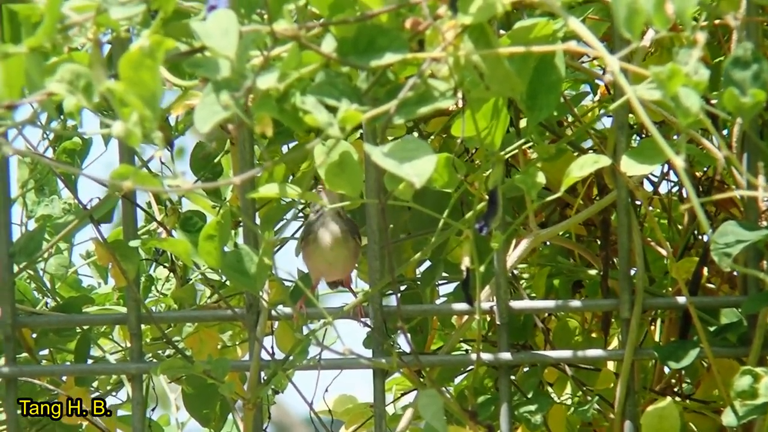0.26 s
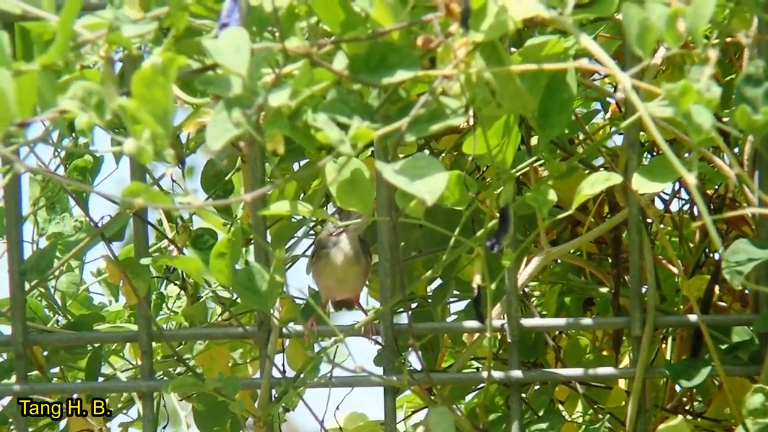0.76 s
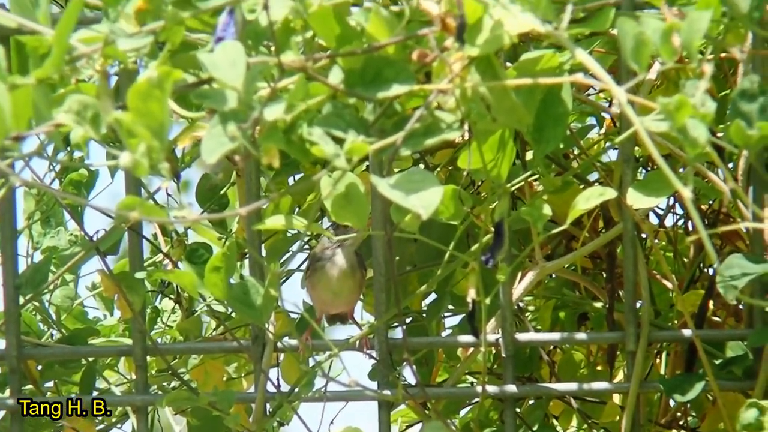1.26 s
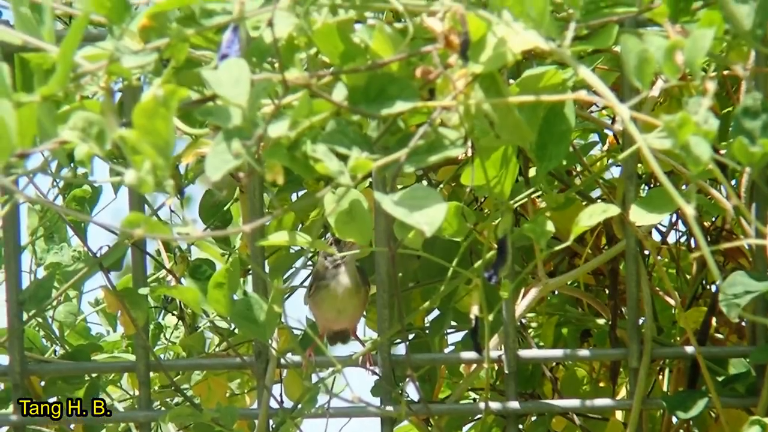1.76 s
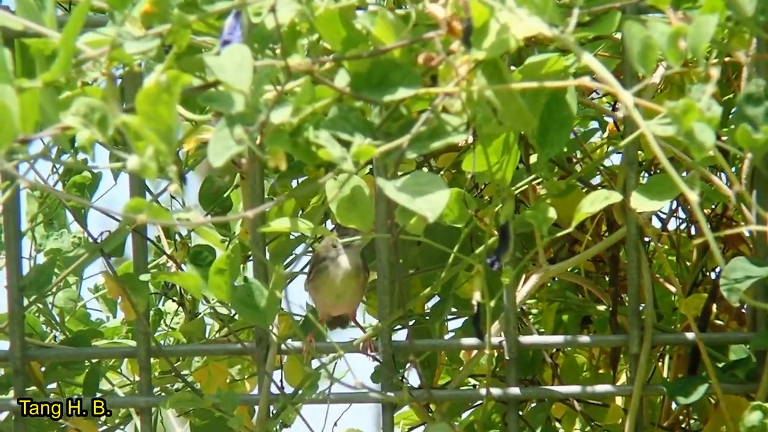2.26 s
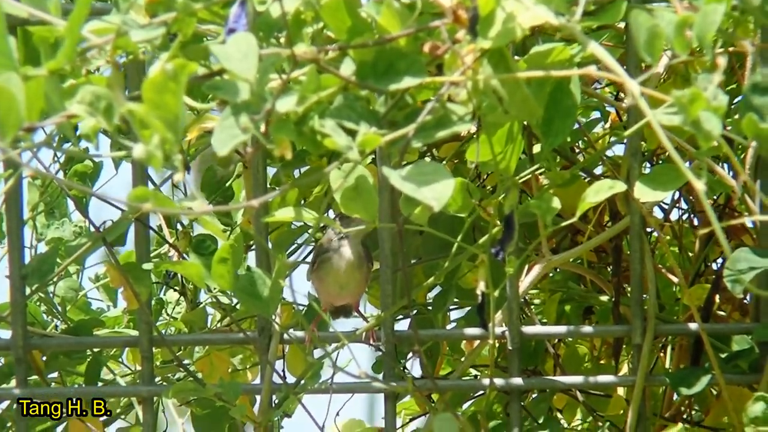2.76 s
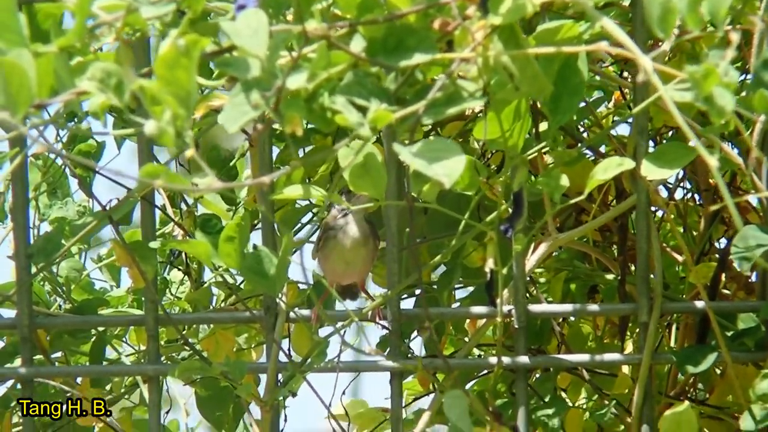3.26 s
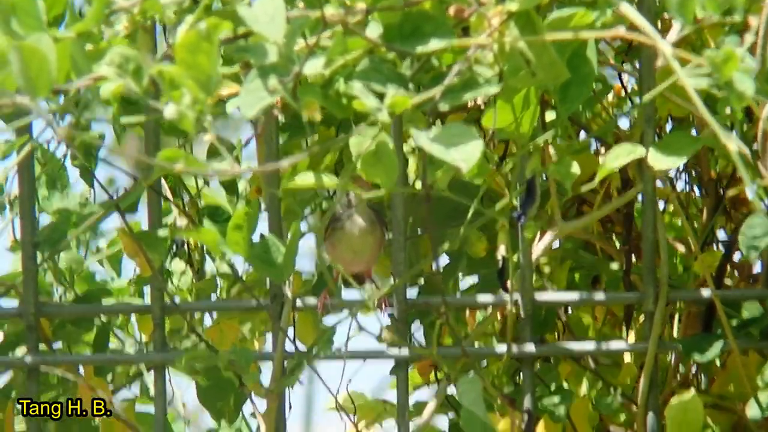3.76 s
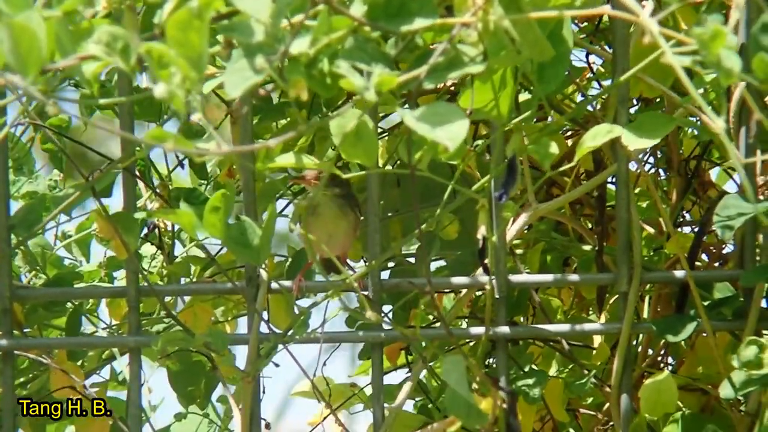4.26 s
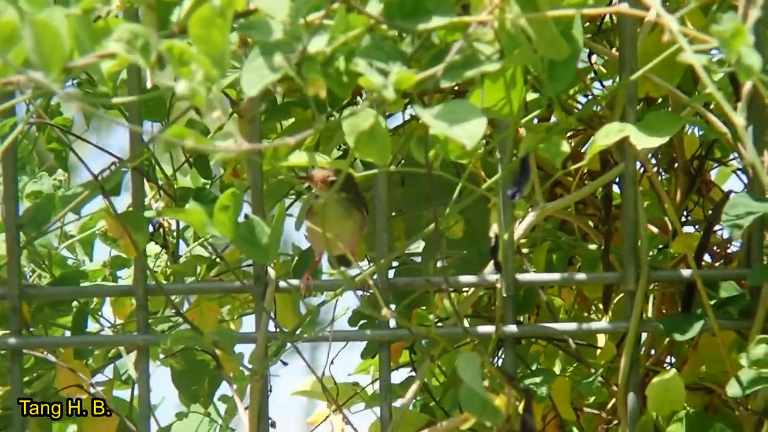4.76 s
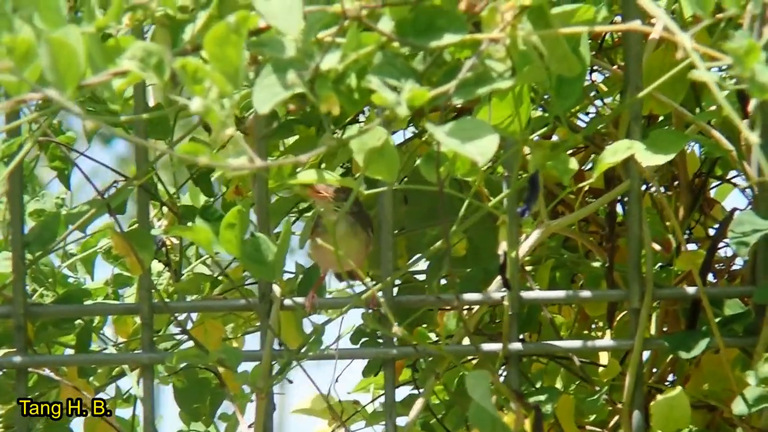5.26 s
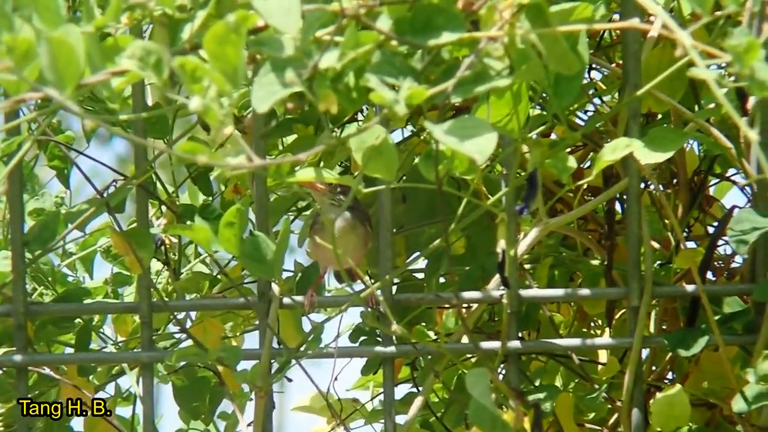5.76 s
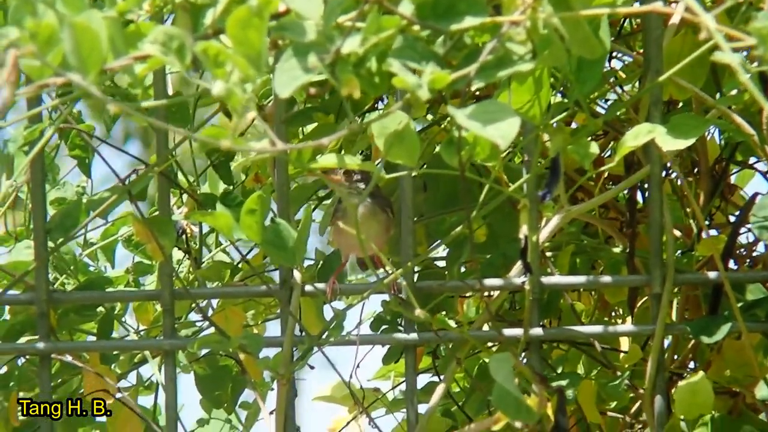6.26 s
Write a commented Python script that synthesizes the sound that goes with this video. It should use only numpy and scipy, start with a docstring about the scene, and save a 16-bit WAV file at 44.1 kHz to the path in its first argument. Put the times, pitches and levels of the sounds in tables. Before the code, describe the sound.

Piercing downward bird chirps repeat steadily in a garden, each with a short scattered tail, above quiet insects, hiss and distant rumble.

```python
"""A garden fence: a small bird perched right of a camera repeats one sharp falling whistle, a near-sine
glide with two close echoes from near surfaces and a tail of shaped noise for the scatter off foliage and walls.
Crickets trill as throbbing narrow noise, and a thin buzz of high pulse partials comes and goes.
A far bird coos in soft sines and something hollow is tapped once, as a handful of ringing modes.
Underneath lie town rumble and camera hiss, both coloured noise; the preamp and converter mark the loud notes."""
import sys
import numpy as np
from scipy import signal
from scipy.fft import rfft, irfft, next_fast_len
from scipy.io import wavfile
from scipy.ndimage import uniform_filter1d

SR = 44100
rng = np.random.default_rng(int(sys.argv[2]) if len(sys.argv) > 2 else 0)


def bounce(signal):
    """Save signal as a 16-bit WAV file at the path given by the first command-line argument."""
    frames = np.transpose(np.atleast_2d(signal))
    limited = np.clip(frames, -1, 1)
    pcm = np.round(limited * 32767).astype(np.int16)
    wavfile.write(sys.argv[1], SR, pcm)


N = 287091


def undb(db):
    """Gain of a level in dB."""
    return 10 ** (np.asarray(db) / 20)


def level(x, db):
    """Scale to an rms level in dB."""
    return x * undb(db) / np.sqrt(np.mean(x ** 2))


def pan(x, pan_db):
    """Two channels with a level difference, left minus right in dB."""
    return np.array([x * undb(pan_db / 2), x * undb(-pan_db / 2)])


def walk(rate):
    """Wandering control: random levels held 1 / rate s and slewed twice; spread near 1."""
    hold = int(SR / rate)
    steps = np.repeat(rng.standard_normal(N // hold + 1), hold)
    return 1.3 * uniform_filter1d(uniform_filter1d(steps, hold), hold)[:N]


def on_log(hz, points):
    """Read (Hz, value) points on a log-frequency axis."""
    point_hz, values = np.transpose(points)
    return np.interp(np.log(hz + 1), np.log(point_hz), values)


def played(rows):
    """Phase and gain of a tone that follows (s, Hz, rms dB) rows, silent outside them."""
    s, hz, db = np.transpose(rows)
    t = np.arange(N) / SR
    edge = np.clip(np.minimum(t - s[0], s[-1] - t) / .01, 0, 1)  # 10 ms ramps
    phase = 2 * np.pi * np.cumsum(np.interp(t, s, hz)) / SR
    return phase, edge * undb(np.interp(t, s, db)) * np.sqrt(2)


def coloured(points, alike, swell_db, flicker_db):
    """Stereo noise in octave bands that swell together and flicker alone."""
    size = next_fast_len(N, True)
    hz = np.fft.rfftfreq(size, 1 / SR)
    spectra = rfft(rng.standard_normal((2, size))) * undb(on_log(hz, points))
    # more mid than side makes left and right alike
    mid, side = spectra * np.sqrt([1 + alike(hz), 1 - alike(hz)])
    stereo = np.array([mid + side, mid - side])
    out, swell, octave = 0, walk(.5), np.log2(hz / 20 + 1)
    for k in range(11):
        share = np.clip(1 - abs(octave - k), 0, 1)
        band = irfft(share * stereo, size)[:, :N]
        out = out + undb(swell_db * swell + flicker_db * walk(9)) * band
    return out


# Hiss colour. Each row: frequency in Hz, relative level in dB per Hz.
HISS_COLOUR = [(1500, -37), (2600, -20), (3600, -18), (4350, -16.5), (4700, -11.5), (5350, -8),
               (6200, -0.5), (7500, -4), (8500, 0), (9600, 2.5), (10050, -7), (10500, -13), (14500, -12.5),
               (15600, -14.5)]


def camera_hiss():
    """Electronic noise, independent in left and right, a touch stronger on the right."""
    hiss = coloured(HISS_COLOUR, lambda hz: 0 * hz, swell_db=.15, flicker_db=.3)
    return level(hiss, -53.5) * undb([[-.7], [.7]])


# Rumble colour. Each row: frequency in Hz, relative level in dB per Hz.
TOWN_COLOUR = [(12, -42), (50, -9), (99, -1), (125, -2.5), (220, -3.5), (280, -6), (343, -6.5),
               (560, -10.5), (680, -15.5), (950, -10.5), (1950, -19.5), (2150, -25.5), (2600, -43),
               (4000, -84)]
# Width of the rumble. Each row: frequency in Hz, likeness of left and right from 0 to 1.
TOWN_ALIKE = [(30, 0.7), (130, 0.51), (400, 0.22), (1400, 0.48), (2500, 0)]


def town_rumble():
    """Low-weighted noise of the town, partly shared by the two channels, a touch stronger on the left."""
    town = coloured(TOWN_COLOUR, lambda hz: on_log(hz, TOWN_ALIKE), swell_db=.3, flicker_db=.6)
    return level(town, -51) * undb([[.4], [-.4]])


# Pulse rate of each of the two thin buzzes, in Hz.
BUZZ_PULSE_HZ = (133.73, 135.57)
# Swells, one list for each buzz. Each row: time in seconds, level in dB of a 0 dB partial before panning.
BUZZ_SWELLS = [
    [(1.9, -76), (2.19, -66), (2.39, -78), (2.44, -65), (2.72, -65), (2.92, -72)],
    [(3.15, -80), (3.5, -79), (3.85, -70), (4.03, -81)],
]
# Partials, one list for each buzz. Each row: multiple of the pulse rate, relative level in dB.
BUZZ_PARTIALS = [
    [(34, -16), (35, -8), (36, -18), (37, -14), (38, 1), (39, -4.5), (40, -12)],
    [(34, 0), (35, -10), (36, -4), (37, 0), (38, -6), (39, -4)],
]


def buzz():
    """High partials of a regular pulse train, each flickering alone."""
    out = 0
    for pulse_hz, swells, partials in zip(BUZZ_PULSE_HZ, BUZZ_SWELLS, BUZZ_PARTIALS):
        phase, gain = played([(s, pulse_hz, db) for s, db in swells])
        for multiple, db in partials:
            flicker = undb(db + 1.5 * walk(22))
            out = out + gain * flicker * np.sin(multiple * phase + 2 * np.pi * rng.random())
    return pan(out, -8.)


def chorus(rows, spread_hz, throb_db, throb_hz=23.3):
    """Wings near one pitch blur into a narrow band that throbs at a wandering rate."""
    phase, gain = played(rows)
    lowpass = signal.ellip(5, 1, 50, spread_hz, fs=SR, output="sos")
    # two slow noises per channel, moved up to the pitch of the wings
    crowd = level(signal.sosfilt(lowpass, rng.standard_normal((2, 2, N))), 0)
    band = crowd[0] * np.cos(phase) + crowd[1] * np.sin(phase)
    throb_phase = 2 * np.pi * np.cumsum(throb_hz * (1 + 0.151 * walk(4))) / SR
    throb = undb(throb_db * np.sin(throb_phase))
    return gain / np.sqrt(2) * throb * band * undb([[-4.], [4.]])  # to the right


# Main chorus. Each row: time in seconds, centre in Hz, level in dB before panning.
CRICKETS = [(0, 4850, -59), (1.5, 4870, -61.5), (2.2, 4930, -63), (3.0, 4806, -62), (3.8, 4834, -64.5),
            (4.6, 4850, -55.5), (5.3, 4880, -59.5), (6.51, 4855, -61)]
# A weaker chorus, higher in pitch. Each row: time in seconds, centre in Hz, level in dB before panning.
HIGH_CRICKETS = [(0, 5310, -67), (.9, 5350, -68), (1.4, 5220, -74), (3.2, 5350, -73), (3.8, 5430, -68),
                 (4.9, 5300, -65), (5.8, 5360, -73), (6.51, 5300, -65)]
# One nearer cricket. Each row: time in seconds, centre in Hz, level in dB before panning.
NEAR_CRICKET = [(3.1, 4800, -65), (3.7, 4800, -61.5), (4.05, 4850, -82)]


def crickets():
    """Two choruses and a single singer with a narrower band and deeper throb, all to the right."""
    singers = chorus(CRICKETS, spread_hz=78., throb_db=.8)
    singers = singers + chorus(HIGH_CRICKETS, spread_hz=60., throb_db=1.)
    return singers + chorus(NEAR_CRICKET, spread_hz=12., throb_db=2.5)


# Soft notes. Each row: start in seconds, length in seconds, top pitch in Hz, droop to the end in Hz,
# level in dB at the crest before wavering and panning.
FAR_BIRD = [(1.035, .2, 1955, 260, -64.5), (1.41, .09, 1940, 25.3, -69), (6.1, .12, 2000, 24.9, -65.5)]


def far_bird():
    """Soft sines of wavering level that crest early in pitch and loudness, then droop."""
    crest = .3  # share of the note
    share, out = np.linspace(0, 1, num=21), 0
    late = (share - crest) / (1 - crest)
    fade_db = -6 * np.maximum(late, 1 - share / crest)  # 6 dB down at both ends
    for s, length, top_hz, droop_hz, db in FAR_BIRD:
        pitch = top_hz - droop_hz * late ** 2
        phase, gain = played(np.transpose([s + length * share, pitch, db + fade_db]))
        out = out + gain * undb(2 * walk(30)) * np.sin(phase)
    return pan(out, 3.)


# Ringing modes of the tap. Each row: frequency in Hz, relative level in dB, decay by 60 dB in seconds.
KNOCK_MODES = [(176, 3, 0.028), (326, 0, 0.062), (620, -3, 0.016), (840, 4, 0.013), (1320, -0.5, 0.011),
               (1790, -11.5, 0.031)]


def knock():
    """One dull tap on something hollow: decaying sines with a softened onset."""
    t = np.maximum(np.arange(N) / SR - .2255, 0)  # seconds since the tap
    ring = sum(undb(db) * np.exp(-np.log(1000) * t / t60) * np.sin(2 * np.pi * hz * t)
               for hz, db, t60 in KNOCK_MODES)
    onset = 1 - np.exp(-(t / 0.0016) ** 2)
    return pan(-undb(-29) * ring * onset, -10.5)


# Foliage and walls. Each row: start in ms, decay by 60 dB in seconds, level in dB on the right,
# likeness of left and right from 0 to 1.
SCATTER = [(8, 0.087, -19, .7), (16, 0.82, -18, 0.4)]


def scattered(source):
    """Foliage and walls return a dense decaying noise of reflections, 4 dB weaker on the left."""
    age, tail = np.arange(SR) / SR, 0
    for start, t60, scatter_db, alike in SCATTER:
        both, *each = rng.standard_normal((3, SR))
        decay = np.exp(-np.log(1000) * age / t60) * (age > start / 1000)
        fade = level(decay, scatter_db) / np.sqrt(SR)
        tail = tail + fade * (np.sqrt(alike) * both + np.sqrt(1 - alike) * np.array(each))
    return signal.fftconvolve(source[None], tail * undb([[-4.], [0]]), axes=1)[:, :N]


# Calls. Each row: start in seconds, shift of the top pitch in Hz, length in ms, level in dB,
# extra push at the opening in dB, lag in ms and level in dB of the first close echo, then of the second.
CALLS = [(0.4686, 5, 151, -10.5, 1.9, 3.3, -15, 4.6, -8), (1.624, 50, 143, -11, 3.2, 3.6, -20, 5.2, -10),
         (2.9279, -9, 150.6, -11.5, 5.2, 2.3, -9.5, 5.7, -11.5),
         (4.0589, -91, 139.5, -12, 1.9, 3.06, -9, 5.215, -10),
         (5.3644, -150, 146, -13, 3.1, 2.2, -23, 5, -10.5)]
# Glide of one whistle. Each row: ms from its start, pitch in Hz before the shift of each call.
GLIDE = [(-3, 5620), (3, 5980), (8, 6015), (41, 5010), (56, 4425), (70, 4060), (85, 3790), (150, 2830)]
# Loud head, drop at the bend, soft end. Each row: ms from the start, level in dB relative to the call.
LOUDNESS = [(-4, -50), (1.5, -23.5), (4, -10.5), (10.5, -7), (18, 0), (29, -2.5), (43, -5), (57.5, -25.5),
            (72, -22.5), (103, -25.5), (132.5, -38.5), (152, -43.5)]
# Overtones. Each row: multiple of the pitch, level in dB under the whistle,
# lowest and highest whistle pitch in Hz at which it is heard.
OVERTONES = [(2, -27, 2800, 4600), (3, -44, 4850, 5240)]
# Delay of the left port in ms: on the high head, then on the low end of the whistle.
LEFT_LAG_MS = (.018, .036)
# The camera body shades the left port from high notes. Each row: pitch in Hz, left minus right in dB.
LEFT_SHADE = [(4300, -2), (4800, -10), (5200, -13), (5660, -6), (5870, -5), (6010, -13)]


def bird():
    """A near-sine whistle with faint overtones, two close echoes that beat with the glide, and a scattered tail."""
    t = np.arange(-10, 170, 1000 / SR)  # ms from the start of a call
    near, source = np.zeros((2, N)), np.zeros(N)
    for s, shift_hz, length, call_db, push_db, lag1, echo1_db, lag2, echo2_db in CALLS:
        # the loud head keeps its pace, the soft end is drawn out or cut short
        place = np.interp(t, [-10, 35, length, 200], [-10, 35, 150, 200])
        # effort moves the top of the glide, the low end stays
        pitch = np.interp(place, *np.transpose(GLIDE)) + shift_hz * np.clip(1 - t / 45, 0, 1)
        turns = np.cumsum(uniform_filter1d(pitch, size=60)) / SR
        shape_db = uniform_filter1d(np.interp(place, *np.transpose(LOUDNESS), -80, -80), size=60)
        opening_db = push_db * np.exp(-((t - 8) / 8) ** 2)
        gain = undb(call_db + opening_db + shape_db)
        whistle = gain * np.sin(2 * np.pi * turns)

        channels = []
        for port_lag in (np.interp(place, [45, 65], LEFT_LAG_MS), 0):  # left, right
            arrivals = 0
            for lag, path_db in [(0, 0), (lag1, echo1_db), (lag2, echo2_db)]:
                sent = t - lag - port_lag  # when this sound left the bird
                wave = np.sin(2 * np.pi * np.interp(sent, t, turns))
                arrivals = arrivals + undb(path_db) * np.interp(sent, t, gain) * wave
            channels.append(arrivals)
        left, right = channels
        shade = undb(uniform_filter1d(on_log(pitch, LEFT_SHADE), size=120))

        first = int((s - .01) * SR)
        at = slice(first, first + len(t))
        near[:, at] += [left * shade, right]
        for multiple, db, low_hz, high_hz in OVERTONES:
            window = np.clip(np.minimum(pitch - low_hz, high_hz - pitch) / 100, 0, 1)
            near[:, at] += undb(db) * gain * np.sin(2 * np.pi * multiple * turns) * window
        source[at] += whistle
    return near + scattered(source)


def scene():
    """Birds, insects and the tap over rumble and hiss."""
    floor = town_rumble() + camera_hiss()
    return floor + buzz() + crickets() + far_bird() + knock() + bird()


# Tones that modulate the preamp gain. Each row: frequency in Hz, level in dB of each sideband
# before the sidebands are filtered.
LEAK = [(4000, -34), (8000, -48)]


def record(dry):
    """Leaking tones put sidebands on the sound, the preamp bends peaks, the converter folds and cuts the top."""
    bend, sampling_hz, fold_db, top_hz = .7, 32000, -13, 15720
    t = np.arange(N) / SR
    leak = dry * sum(2 * undb(db) * np.cos(2 * np.pi * hz * t) for hz, db in LEAK)
    # the sidebands are weak in the deep bass, near the top and in a gap above the rumble
    span = signal.butter(1, [1400, 7500], "band", fs=SR, output="sos")
    gap = signal.butter(1, [2400, 4600], "stop", fs=SR, output="sos")
    sidebands = signal.sosfilt(np.vstack([span, gap]), leak)
    bent = -bend * dry ** 3
    # the third harmonic above half the sampling rate mirrors back below it
    treble = signal.butter(8, 14500, "high", fs=SR, output="sos")
    mirrored = signal.sosfilt(treble, bent) * 2 * np.cos(2 * np.pi * sampling_hz * t)
    folded = signal.sosfilt(treble, mirrored)
    wet = dry + sidebands + bent + undb(fold_db) * folded
    return signal.sosfilt(signal.ellip(12, .2, 75, top_hz, fs=SR, output="sos"), wet)


dry = scene()
out = record(dry)
bounce(out)
```